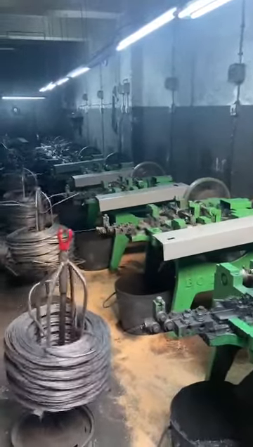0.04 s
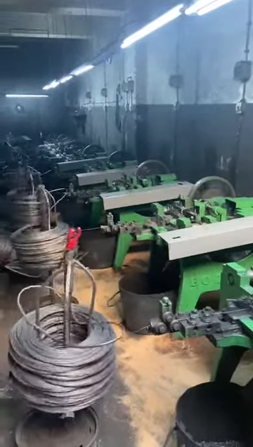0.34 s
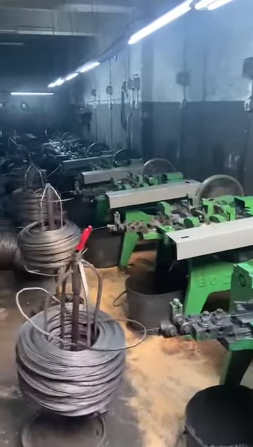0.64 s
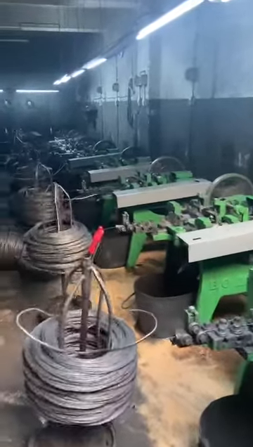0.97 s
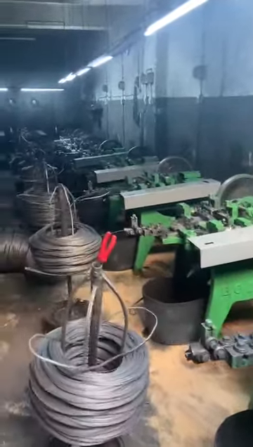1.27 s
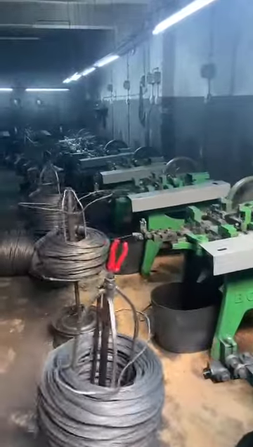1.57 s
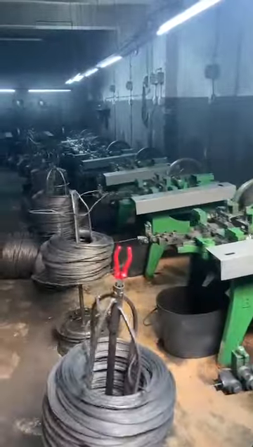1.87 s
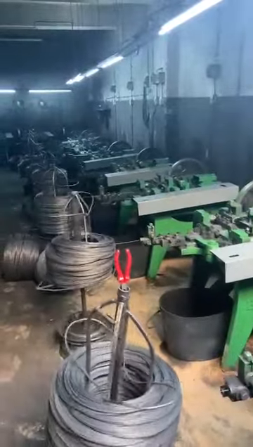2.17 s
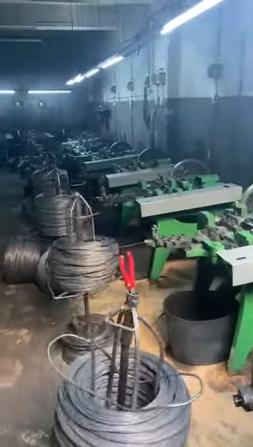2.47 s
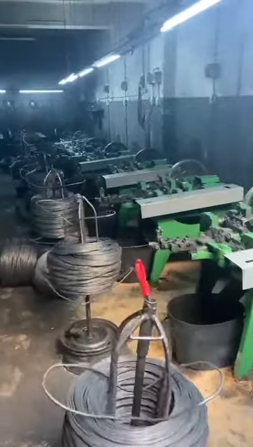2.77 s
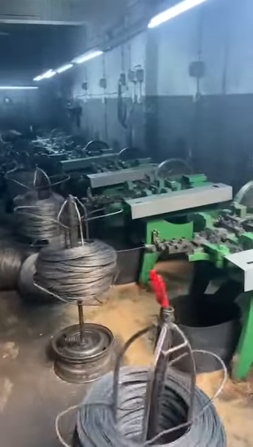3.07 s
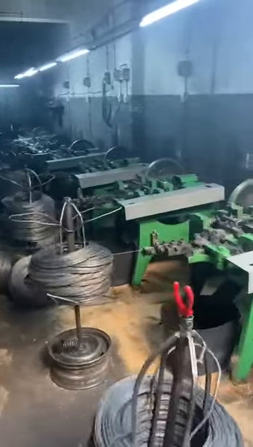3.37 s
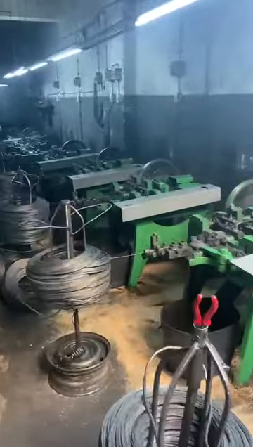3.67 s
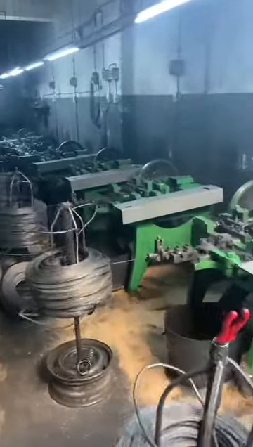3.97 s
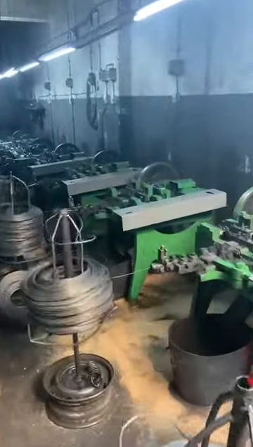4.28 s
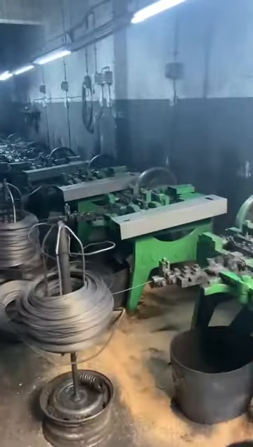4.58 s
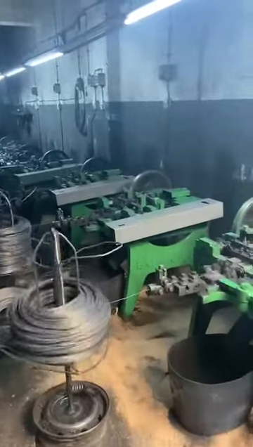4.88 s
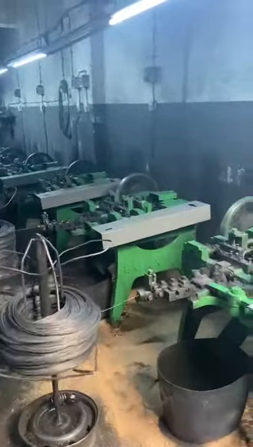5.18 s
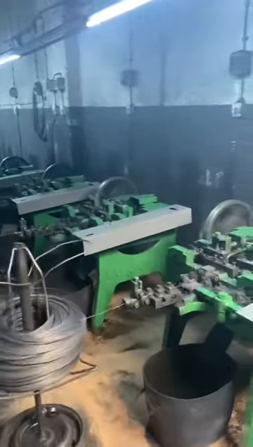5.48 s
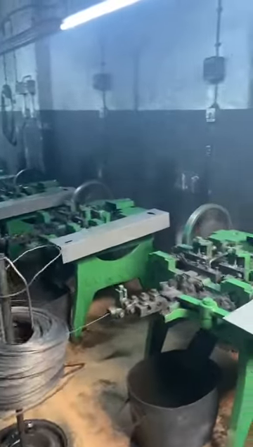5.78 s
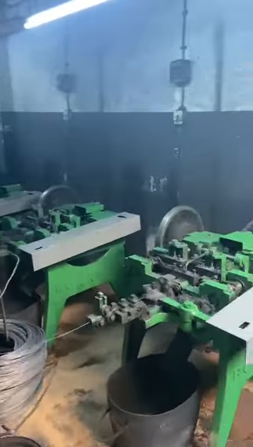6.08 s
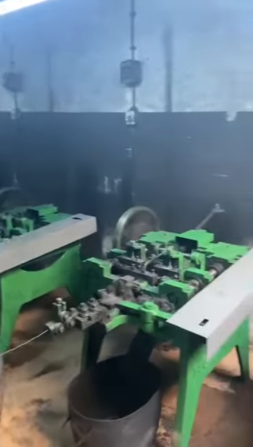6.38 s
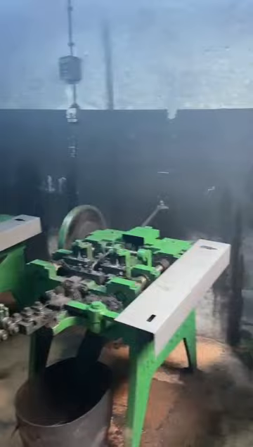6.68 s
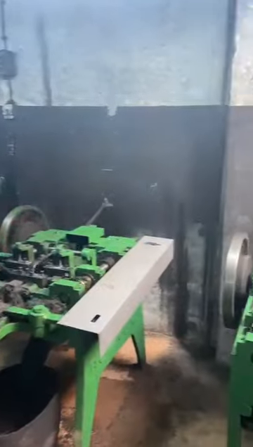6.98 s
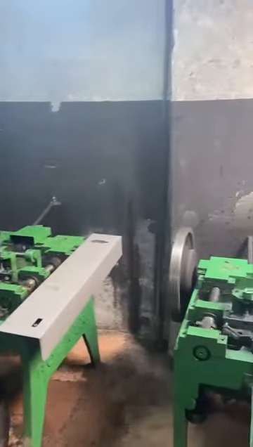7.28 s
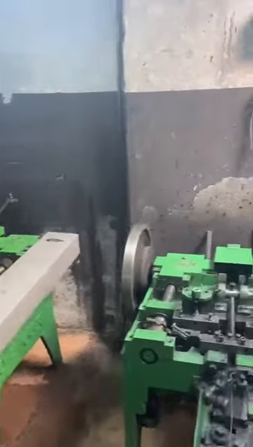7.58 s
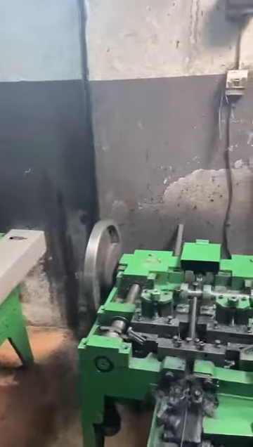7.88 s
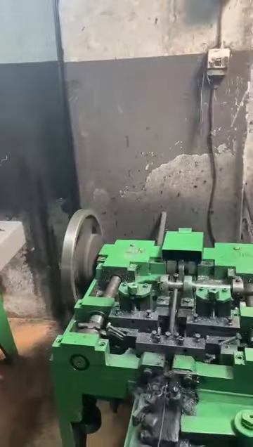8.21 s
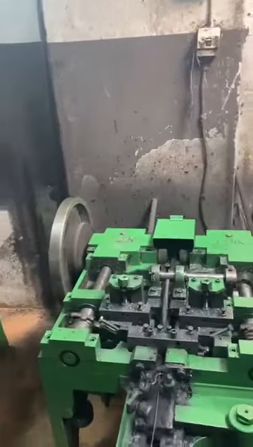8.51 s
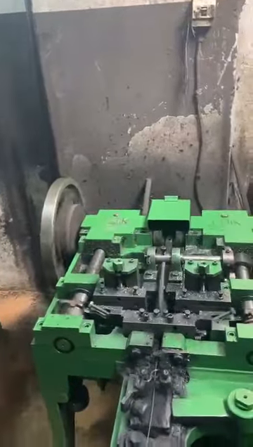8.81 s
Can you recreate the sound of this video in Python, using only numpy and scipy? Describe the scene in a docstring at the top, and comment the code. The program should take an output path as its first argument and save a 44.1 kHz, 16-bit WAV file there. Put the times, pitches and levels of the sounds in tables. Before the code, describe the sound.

A loud, steady workshop roar of nail-making machines, with rapid metal knocks, scattered hard bangs, scraping wire and a wavering motor hum.

```python
"""Two nail-making machines hammer steel wire in a hard-walled workshop as we walk past them.
A crank drives each one: every turn it knocks a head on a nail, cuts it off and scrapes in more wire.
Their speeds differ slightly, so the blows drift in and out of step. Hard bangs stand out as the rest
of the row blurs into a roar. Loose wire jingles, cut nails clink and steel frames sing,
over a wavering motor hum and a floor that throbs and rumbles."""
import sys
import numpy as np
from scipy import signal
from scipy.fft import rfft, irfft
from scipy.io import wavfile
from scipy.ndimage import uniform_filter1d

SR = 44100
rng = np.random.default_rng(int(sys.argv[2]) if len(sys.argv) > 2 else 0)


def wrap_up_sound(samples):
    """Save the sound to the file named by the first command line argument, as 16-bit audio."""
    columns = np.atleast_2d(samples).T
    # keep every value between -1 and 1, then stretch to whole-number steps
    tamed = np.clip(columns, -1, 1)
    steps = np.round(tamed * 32767).astype(np.int16)
    wavfile.write(sys.argv[1], SR, steps)


N = 390285
T, FREQS = np.arange(N) / SR, np.fft.rfftfreq(N, 1 / SR)
NEAR_RATE, NEXT_RATE, HEAVY_RATE = 8.667, 8.565, 8.478  # crank turns per second

# tone colour (how strong each frequency is) of a heavy knock: (frequency [Hz], level [dB])
KNOCK_COLOUR = [(100, -17.5), (500, -8.5), (640, -2), (770, -0.5), (1000, -1.5), (1300, -3), (1700, -7),
                (3000, -15), (11300, -38)]
# tone colour of scraping wire: (frequency [Hz], level [dB])
SCRAPE_COLOUR = [(1000, -26), (3500, -7), (6000, 8.5), (9000, 5), (10000, 6), (11300, 3)]


def gain_of(db):
    """Turns decibels into a number to multiply a sound by."""
    return 10 ** (np.asarray(db) / 20)


def evened(x):
    """Scales a signal so that its typical size (rms) is 1."""
    return x / np.sqrt(np.mean(x ** 2) + 1e-20)


def over_freq(table):
    """Joins a table's points into curves over frequency, one for each column after the first."""
    hz, *columns = np.transpose(table)
    return [np.interp(np.log(FREQS + 1), np.log(hz + 1), c) for c in columns]


def over_time(table):
    """Joins a table's points into curves over time, one for each column after the first."""
    s, *columns = np.transpose(table)
    return [np.interp(T, s, c) for c in columns]


def wander(hz):
    """A random curve of typical size 1 that wiggles up to about hz times a second."""
    return evened(irfft(rfft(rng.standard_normal(N)) * np.exp(-(FREQS / hz) ** 2), N))


def bump(s, half_s):
    """A smooth rise and fall that reaches 1 at time s."""
    return np.exp(-((T - s) / half_s) ** 2)


def ripple(width_hz):
    """A random curve over frequency: the many close pitches at which steel rings."""
    lag = np.arange(2 * len(FREQS) - 2) / SR
    return evened(rfft(rng.standard_normal(len(lag)) * np.exp(-np.pi * width_hz * lag)).real)


def vibration(colour, rate=None):
    """Ringing steel as stereo noise; given a crank rate, part of it repeats on every turn."""
    # heavy parts move alike each turn, light ones rattle freely: (frequency [Hz], repeating share [0-1])
    repeating = [(60, 0.97), (200, 0.3), (500, 0.66), (1000, 0.49), (2000, 0.23), (5000, 0.33)]
    # how the left and right microphones compare:
    # (frequency [Hz], likeness [0-1], left ahead by [radians], left louder by [dB])
    left_and_right = [(116.5, 0.94, 0, 0), (196, 1, 0, -0.5), (348, 0.95, 0, 2.5), (474, 0.83, 0.37, 1),
                      (618, 0.34, 1.33, 6.5), (744, 0.34, -0.3, 6), (1160, 0.44, .5, 4.5),
                      (1450, 0.56, 0, 3), (1910, 0.51, 0.52, .5), (2490, 0.62, 2, 0),
                      (3150, 0.5, 2.5, -0.1), (3660, 0.24, 1.5, 1), (3970, 0.67, -0.14, -1),
                      (4500, 0.34, 0.4, 0.5), (5200, 0.85, .1, -1.3), (5600, 0.72, 0.03, 2.5),
                      (6130, 0.43, 1.7, -1), (6450, 1, 2.5, -2), (8540, 0.7, 3, 1), (8930, 0.35, 5, -0.5),
                      (9400, 0.93, 6, 0)]
    # ringing of frames, guards and wire coils: (frequency [Hz], width [Hz], boost [dB])
    resonances = [(105, 63, -1.5), (469, 45, 3), (700, 47, 0.5), (812, 28, 0), (1000, 94, 3),
                  (1180, 91, 2.5), (1870, 110, 2.5), (2580, 96, 1.5), (2930, 270, 1), (3410, 190, 1.5),
                  (3670, 190, 2.5), (4470, 90, 1.5), (5200, 390, 1.2), (10780, 340, 3)]
    noise = rfft(rng.standard_normal((2, N)))
    if rate:
        looped = rng.standard_normal((2, SR))[:, np.arange(N) % round(SR / rate)]
        share = np.clip(over_freq(repeating)[0], 0, 1)
        noise = np.sqrt(1 - share) * noise + np.sqrt(share) * rfft(looped)
    likeness, lead, tilt_db = over_freq(left_and_right)
    likeness = np.clip(likeness, 0, 1)
    left = noise[0] * gain_of(tilt_db / 2)
    right = likeness * noise[0] + np.sqrt(1 - likeness ** 2) * noise[1]
    right = right * np.exp(-1j * lead) * gain_of(-tilt_db / 2)
    ring_db = sum(db / (1 + (2 * (FREQS - hz) / width) ** 2) for hz, width, db in resonances)
    # single pitches stand out in the middle range; higher up they crowd together and even out
    ring_db += 1.7 * ripple(width_hz=25) * np.minimum(FREQS / 700, 4000 / (FREQS + 3000))
    return evened(irfft(np.array([left, right]) * gain_of(over_freq(colour)[0] + ring_db), N))


def strokes(rate, blows, uneven_db, chatter_db):
    """Loudness curve of repeated blows: each swells, then dies away by 60 dB in its ring time."""
    power = np.zeros(N)
    for delay, db, rise_s, ring_s in blows:
        turn, part = np.divmod((T - delay) * rate, 1)
        force = gain_of(db + uneven_db * rng.standard_normal(200))  # no two blows are equally hard
        for back in range(2):  # the previous blow still rings under this one
            age = (part + back) / rate
            ring = force[turn.astype(int) - back] * gain_of(-60 * age / ring_s)
            power += ring ** 2 * np.minimum(age / rise_s, 1)
    chatter = gain_of(chatter_db * wander(500))  # loose parts shake within each blow
    return evened(np.sqrt(power) * chatter)


def near_machine(frame_db):
    """Tools knock and crack on the wire, moving parts clatter on the frame, and new wire scrapes in."""
    # one turn's knocks (shaping the head, cutting), cracks (tool on wire), clatter and wire scrapes,
    # each: (delay [s], level [dB], rise time [s], ring time [s])
    knocks = [(0.0127, -1.5, 0.0031, 0.11), (.067, -2.5, 0.0041, 0.16), (.0732, 0.5, .002, 0.17)]
    cracks = [(.014, -3, .002, 0.11), (0.0727, -6, 0.0033, 0.095)]
    clatter = [(.01, -8.5, 0.0079, 0.18), (.065, 3, 0.0065, 0.51), (.072, -1.5, .004, 0.17),
               (.094, -17, 0.01, 0.28)]
    scrapes = [(.07, 1, 0.0044, 0.11), (.088, -1, 0.013, 0.32)]
    # tone colours of the crack and the frame: (frequency [Hz], level [dB])
    crack_colour = [(500, -20), (1500, 3), (2500, 3), (4000, -3), (6000, -1), (11300, -15.5)]
    frame_colour = [(40, -28), (70, -10), (102, 1.5), (150, -4), (205, 0), (300, -5), (560, -3.5),
                    (800, -11.5), (1200, -4), (1800, -3), (2500, 0.5), (4000, -9.5), (6000, -13),
                    (11300, -20.5)]
    # blows that stand out or fall weak: (time [s], boost [dB])
    accents = [(6.075, 1.5), (6.877, 3), (6.995, -9), (7.112, 1), (7.228, 1), (7.345, 0.5), (7.46, 1),
               (7.579, -2), (7.692, 0), (7.808, 1), (7.925, -2), (8.04, -6), (8.268, 5), (8.615, -4)]
    # spots where we pass close to the wire feed: (time [s], half length [s], boost [dB])
    feed_passes = [(1.3, .45, 11), (2.15, 0.43, 12), (5.0, .4, 7), (7.0, 0.65, 11), (8.698, .3, 7)]
    knock = vibration(KNOCK_COLOUR, NEAR_RATE) * strokes(NEAR_RATE, knocks, uneven_db=2.5, chatter_db=2)
    crack = vibration(crack_colour) * strokes(NEAR_RATE, cracks, uneven_db=1, chatter_db=1.5)
    frame = vibration(frame_colour, NEAR_RATE) * strokes(NEAR_RATE, clatter, uneven_db=.5, chatter_db=.5)
    wire = vibration(SCRAPE_COLOUR) * strokes(NEAR_RATE, scrapes, uneven_db=4.5, chatter_db=1)
    accent_db = sum(db * bump(s, half_s=0.021) for s, db in accents)
    feed_db = sum(db * bump(s, half_s) for s, half_s, db in feed_passes)
    hammering = gain_of(accent_db) * (gain_of(-31) * knock + gain_of(-41) * crack)
    return hammering, gain_of(frame_db - 30) * frame + gain_of(feed_db - 49) * wire


def next_machine(frame_db):
    """The slightly slower neighbour knocks and clatters too; its bright scraping carries down the row."""
    # one turn's knocks, clatter and wire scrapes: (delay [s], level [dB], rise time [s], ring time [s])
    knocks = [(.004, -9, 0.004, 0.24), (0.0391, -6.5, 0.0023, 0.14), (0.1024, -1.5, .0025, .13)]
    clatter = [(.016, -1.5, 0.012, 0.29), (.04, -5.5, 0.0082, 0.26), (.089, -3, .01, .3),
               (0.099, -2.5, 0.0049, 0.2)]
    scrapes = [(.002, -6, .008, 0.41), (.013, 1, .005, 0.19), (0.097, -3, .004, 0.27)]
    # tone colour of its frame: (frequency [Hz], level [dB])
    frame_colour = [(40, -30), (100, -3.5), (300, 3.5), (560, -2), (780, 0), (1200, 2.5), (1800, -4.5),
                    (2500, 2), (4000, -12), (6000, -10.5), (11300, -25)]
    knock = vibration(KNOCK_COLOUR, NEXT_RATE) * strokes(NEXT_RATE, knocks, uneven_db=1, chatter_db=.5)
    frame = vibration(frame_colour, NEXT_RATE)
    frame *= strokes(NEXT_RATE, clatter, uneven_db=.6, chatter_db=1.5)
    wire = vibration(SCRAPE_COLOUR) * strokes(NEXT_RATE, scrapes, uneven_db=1.5, chatter_db=2)
    return gain_of(-32) * knock, gain_of(frame_db - 30.5) * frame + gain_of(-36.5) * wire


def far_row():
    """Distant machines strike twice a turn; their echo in the hall is a steady roar."""
    # tone colours of the roar and the distant frames: (frequency [Hz], level [dB])
    roar_colour = [(25, -24), (42, -20), (53, -6.5), (95, -3), (150, -9), (230, -7), (330, 3), (450, -1),
                   (560, -2.5), (780, 0), (1700, -7), (2500, -4), (4000, -10), (6000, -15), (11300, -22)]
    frame_colour = [(35, -28), (60, -14), (150, -1), (400, -1.5), (1000, -2.5), (2500, -8.5), (6000, -20.5),
                    (11300, -26)]
    # one value for each machine: (crank speed [turns per second]) and (level [dB])
    rates = (8.49, 9.53, 8.31, 6.19)
    levels = [-31, -33.5, -34, -35.5]
    out = gain_of(-23.5) * vibration(roar_colour) * gain_of(0.5 * wander(54))
    for rate, db in zip(rates, levels):
        delay = rng.random() / rate
        blows = [(delay, 0, .0025, .18), (delay + .5 / rate, -2, .0025, .18)]
        frame = vibration(frame_colour, rate)
        out += gain_of(db) * frame * strokes(rate, blows, uneven_db=1.36, chatter_db=0)
    return out


def wire_reels(shakes_per_s=13.28, fade_db_per_s=1):
    """Wire sizzles as it slides off the reels and jingles as it shakes; both fade as we walk on."""
    # tone colour of the sliding wire: (frequency [Hz], level [dB])
    sizzle_colour = [(2000, -21), (3500, 0), (4600, -2), (6000, 0), (11300, -14)]
    shakes = strokes(shakes_per_s, [(.002, 0, 0.012, 0.14)], uneven_db=3.5, chatter_db=1.5)
    jingle = gain_of(1.4 * wander(5) - 3) * vibration(SCRAPE_COLOUR) * shakes
    sizzle = gain_of(-1) * vibration(sizzle_colour)
    return gain_of(-36.5 - fade_db_per_s * T) * (jingle + sizzle)


def nail_clinks(per_s=300, low_hz=1394, high_hz=5775, ring_s=0.1):
    """Cut nails drop onto heaps; each rings at its own pitch and place until the heap stills it."""
    out, t = np.zeros((2, N + SR)), np.arange(SR // 6) / SR
    ring = gain_of(-60 * t / ring_s) * np.minimum(t / 0.0011, 1)
    for when, pitch, strength, lead in rng.random((round(per_s * N / SR), 4)):
        hz = low_hz * (high_hz / low_hz) ** pitch
        boost_db = 3.5 * min(-np.log(1 - strength), 3)  # most land softly, a few land hard
        force = gain_of(boost_db) * (low_hz / hz) ** 0.43
        start, phase = int(when * N), 2 * np.pi * hz * t
        out[:, start:start + len(t)] += force * ring * np.sin([phase, phase + 2 * np.pi * lead])
    return gain_of(-32.5) * evened(out[:, :N])


def singing_frames():
    """Constant hammering keeps the steel frames ringing; each tone swells as we pass it."""
    # the frames' tones: (frequency [Hz], level [dB], time we pass [s], half length of the swell [s])
    tones = [(745, -42, 1.6, 2.8), (754, -42.5, 2.3, 1.8), (775, -40.5, 8.2, 2.2), (790, -42.5, 4.9, 3.2),
             (789, -43, 5, 1.5), (861, -39.5, 1.9, 0.8)]
    out, ear_shift = np.zeros((2, N)), np.array([[.25], [-.25]])
    for hz, db, s, half_s in tones:
        level = gain_of(db + 2.5 * wander(14)) * (0.28 + 0.73 * bump(s, half_s))
        phase = 2 * np.pi * (hz * T + rng.random()) + .3 * wander(3.4)
        out += level * np.cos(phase + ear_shift)
    return np.sqrt(2) * out * gain_of([[2.5], [-2.5]])  # louder on the left


def floor_throb(pass_s=1.7, rise_db_per_s=2, fall_db_per_s=0.7):
    """A heavy machine shakes the floor with low tones that beat together, loudest as we pass it."""
    # tones made by the crank: (multiple of the crank speed [times], level [dB])
    crank_tones = [(7, -54), (8, -41), (9, -42.5), (12, -48.5), (16, -42), (17, -43), (19, -46.5),
                   (38, -48.5)]
    # further wavering low tones in the throb: (frequency [Hz], level [dB])
    other_low_tones = [(53.1, -56), (57.2, -53), (122.3, -48.5), (333.9, -56.5), (339.3, -42)]
    out = np.zeros(N)
    for hz, db in [(round(k) * HEAVY_RATE, db) for k, db in crank_tones] + other_low_tones:
        level = gain_of(db + 2.46 * wander(3.7))
        out += level * np.cos(2 * np.pi * (hz * T + rng.random()) + 0.12 * wander(0.93))
    drop_db = np.maximum(rise_db_per_s * (pass_s - T), fall_db_per_s * (T - pass_s))
    return np.sqrt(2) * gain_of(1.5 - drop_db) * out


def floor_rumble():
    """The near machines shake the floor unevenly, more so in the second half of the walk."""
    # tone colour of the floor: (frequency [Hz], level [dB])
    floor_colour = [(25, -27), (45, -16), (58, 0.5), (72, -14), (87, -8), (100, -2), (114, 4.5), (130, 3.5),
                    (150, -12.5), (185, -1), (240, -20), (600, -51)]
    # strength of the shaking along the walk: (time [s], level [dB])
    levels = [(0, -47), (3, -52), (5.3, -40), (7.3, -37.5), (8.85, -41)]
    shaking = irfft(rfft(rng.standard_normal(N)) * gain_of(over_freq(floor_colour)[0]), N)
    return gain_of(over_time(levels)[0]) * evened(shaking)


def motor_hum(hz=330.8, pulse_depth=0.14, fade_db_per_s=0.2):
    """A wavering hum pulses as each stroke loads the motor, and slowly fades along the walk."""
    # spots where the hum and its echoes cancel: (time [s], half length [s], level change [dB])
    quiet_spots = [(0, 0.34, -8), (3.85, 0.76, -14), (6.05, 0.11, -6), (8.3, .17, -9), (8.85, .15, -2)]
    level_db = -32.5 - fade_db_per_s * T + sum(db * bump(s, half_s) for s, half_s, db in quiet_spots)
    load = 1 + pulse_depth * np.cos(2 * np.pi * (HEAVY_RATE * T + rng.random()))
    tone = np.cos(2 * np.pi * hz * T + 0.58 * wander(4.5)) * load * gain_of(2.7 * wander(8.3))
    return gain_of(level_db) * evened(tone) * gain_of([[1.1], [-1.1]])  # louder on the left


def hard_bangs(rise_s=0.002, ring_s=0.13):
    """Single loud bangs from other machines in the row stand out of the roar."""
    # the bangs: (time [s], level [dB])
    bangs = [(.305, -26), (.452, -27), (0.763, -16.5), (.805, -29), (1.325, -20), (1.503, -22),
             (2.102, -27), (2.205, -18), (2.55, -20), (2.665, -32), (3.074, -21), (3.42, -26), (3.765, -28),
             (3.875, -26), (4.228, -18), (4.687, -23), (4.914, -23), (5.035, -21), (5.499, -25),
             (5.725, -24), (6.177, -21)]
    power = np.zeros(N)
    for s, db in bangs:
        age = np.maximum(T - s, 0)
        ring = gain_of(db - np.minimum(60 * age / ring_s, 100))
        power += ring ** 2 * np.minimum(age / rise_s, 1)
    return np.sqrt(power) * (vibration(KNOCK_COLOUR) + gain_of(-22) * vibration(SCRAPE_COLOUR))


def flicker(x, depth_db=1.52, sway_db=0.26):
    """The treble flickers in small patches of pitch and time, and sways slightly as a whole."""
    hz, s, spectrum = signal.stft(x, SR, nperseg=1024)
    patches = uniform_filter1d(rng.standard_normal(spectrum.shape[1:]), size=9, axis=0)
    patches = evened(uniform_filter1d(patches, size=8, axis=1))
    change_db = depth_db * patches * np.minimum(hz / 2500, 1)[:, None]
    change_db += sway_db * np.outer(np.minimum(hz / 8000, 1), np.interp(s, T, wander(7)))
    return signal.istft(spectrum * gain_of(change_db), SR, nperseg=1024)[1][:, :N]


def steep_filter(x, edges_hz, keep_bass, size=801):
    """Switches sharply between keeping and removing sound at each edge frequency."""
    taps = signal.firwin(size, edges_hz, pass_zero=keep_bass, window=("kaiser", 7), fs=SR)
    return signal.oaconvolve(x, taps, "same")


def limiter(x, above_db, share, size=350):
    """Softens loud moments by taking away a share of the level that goes over above_db."""
    level_db = 10 * np.log10(abs(uniform_filter1d((x ** 2).mean(0), size=size)) + 1e-12)
    excess_db = uniform_filter1d(np.maximum(level_db - above_db, 0), size=size)
    return x / gain_of(share * excess_db)


def scene():
    """Adds up the workshop; the machines grow and fade as we walk past them."""
    # the near machine's clatter along the walk: (time [s], level [dB])
    walk = [(0, -6), (.6, -9), (1.3, 0.5), (2.2, -5.5), (3.2, -1.5), (5, -.5), (5.9, -0.5), (6.9, 0.5),
            (7.6, 1), (8.2, 1.7), (8.85, -0.7)]
    # how well the hammering reaches us: (time [s], near machine [dB], its neighbour [dB])
    hammer_reach = [(0, -2, -10), (1.5, 0, 1.5), (2.8, -2.5, -4), (4, -5, 0), (5.2, -3, 1.5), (6.3, 0, -1),
                    (6.9, -1, 1), (7.6, 4.5, -3), (8.85, -0.5, -1)]
    walk_db = over_time(walk)[0]
    near_reach, next_reach = gain_of(over_time(hammer_reach))
    near_hammering, near_clatter = near_machine(frame_db=walk_db)
    next_hammering, next_clatter = next_machine(frame_db=0.37 * walk_db + .5)
    pair = near_reach * near_hammering + near_clatter + next_reach * next_hammering + next_clatter
    far_db = .2 - 0.85 * np.maximum(walk_db + 1.5, 0)  # the roar of the row drops when the near machine is loud
    machines = pair + gain_of(far_db) * far_row() + hard_bangs() + wire_reels()
    return flicker(machines) + nail_clinks() + singing_frames() + floor_throb() + floor_rumble() + motor_hum()


def record(dry):
    """Makes the bass and top mono, softens the hardest blows and cuts the highest treble."""
    # with the shared part removed, the two ears move in opposite directions in this treble band
    shared = steep_filter((dry[0] + dry[1]) / 2, edges_hz=(6440, 8360), keep_bass=True, size=401)
    stereo = steep_filter((dry[0] - dry[1]) / 2, edges_hz=(225, 9300), keep_bass=False)
    ears = limiter(np.array([shared + stereo, shared - stereo]), above_db=-9, share=0.31)
    return np.array([steep_filter(ear, edges_hz=11680, keep_bass=True) for ear in ears])


dry = scene()
out = record(dry)
wrap_up_sound(out)
```